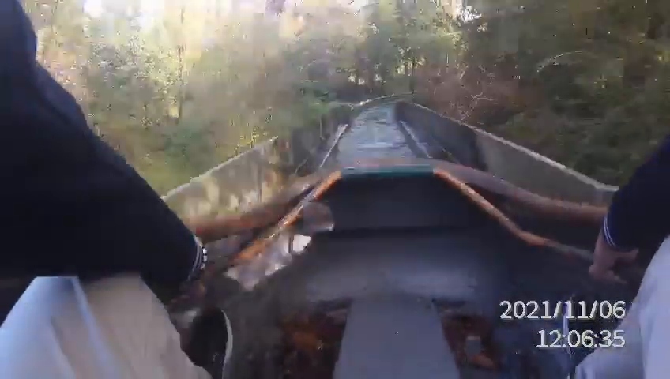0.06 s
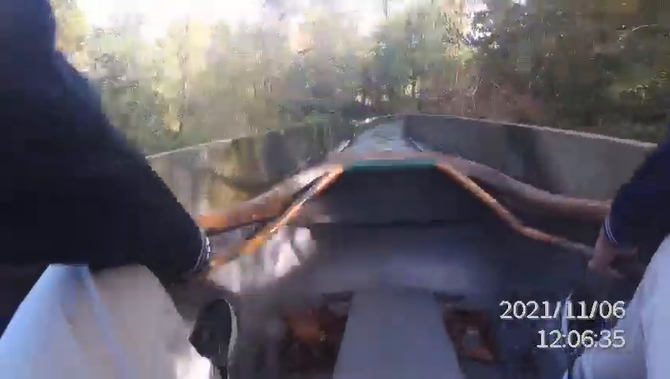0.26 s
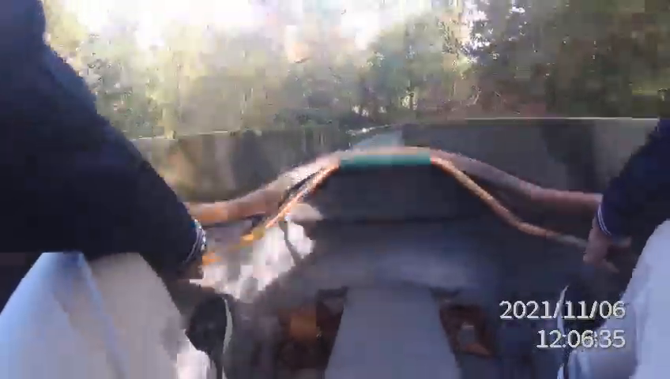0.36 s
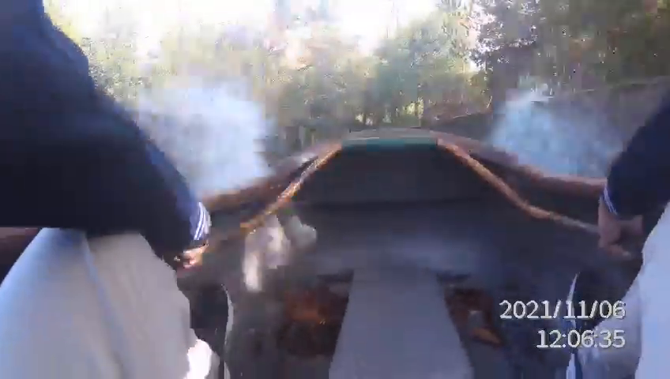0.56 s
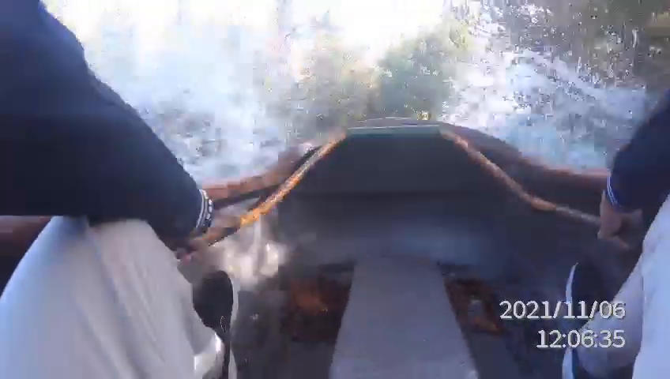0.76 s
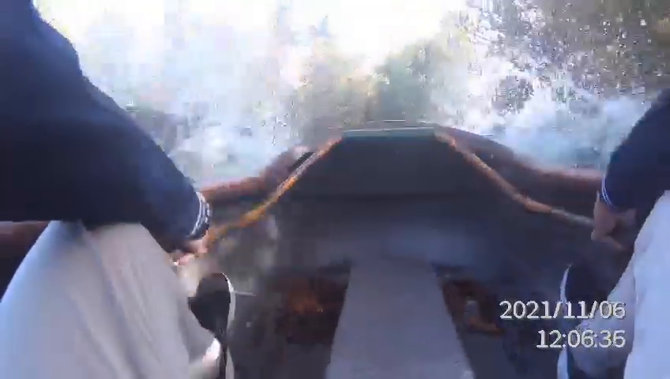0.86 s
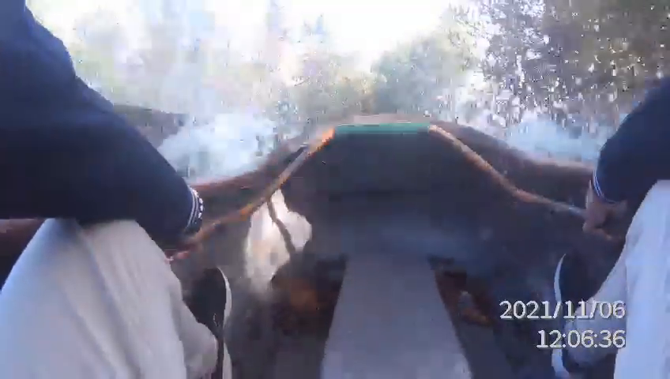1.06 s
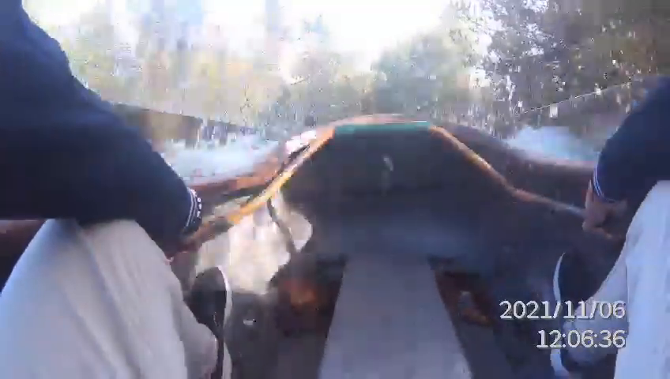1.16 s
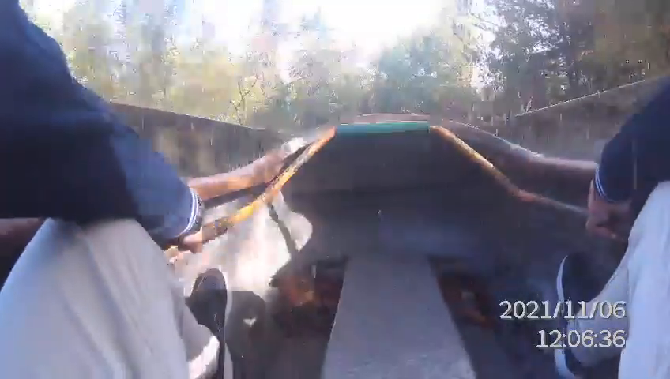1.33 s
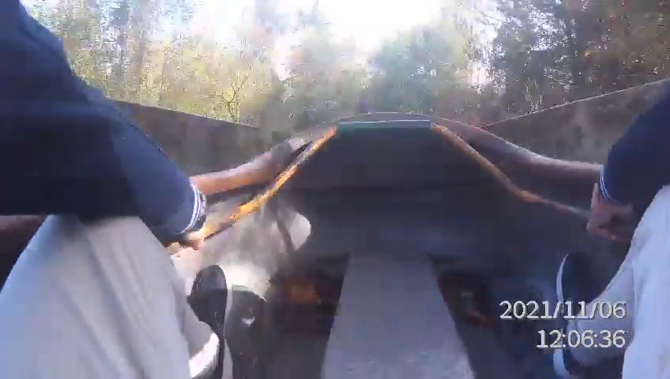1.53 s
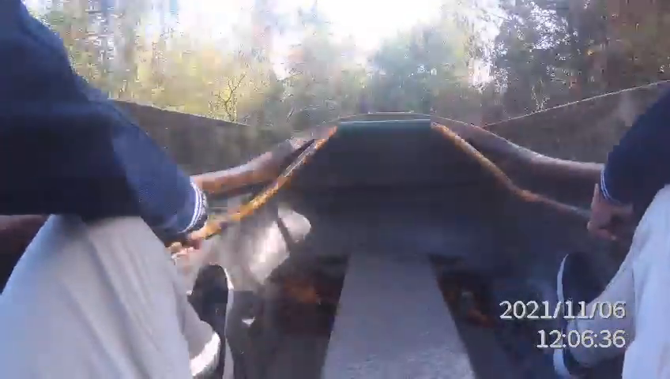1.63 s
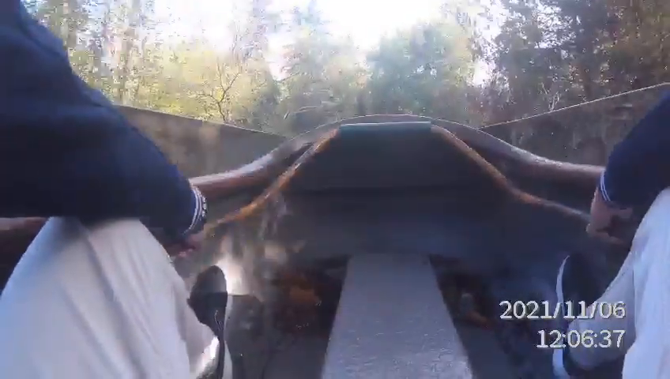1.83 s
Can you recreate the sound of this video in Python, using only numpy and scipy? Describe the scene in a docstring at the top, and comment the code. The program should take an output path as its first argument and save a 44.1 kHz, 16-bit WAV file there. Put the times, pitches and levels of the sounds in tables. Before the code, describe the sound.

A ride boat splashes into water at the foot of a drop: quick plastic knocks build to one harsh overloaded crack, then churning water and spray surge and slowly thin, heard from on board in a case.

```python
"""Flume boat splashdown

A flume boat runs into the water at the foot of a drop, heard from a camera in a plastic case on board.
Water: ringing bubbles and drops over coloured noise, for churn, splash and spray that thins out; a few gulps.
Knocks: bursts of noise ring the modes of the case, mostly on the right; the hardest overloads the microphone.
Hull: a wandering drone, deep noise and decaying sine thumps; a faint hum swells once near the end."""
import sys
import numpy as np
from scipy import signal
from scipy.fft import rfft, irfft
from scipy.io import wavfile

SR = 44100
rng = np.random.default_rng(int(sys.argv[2]) if len(sys.argv) > 2 else 0)


def put_to_file(sound):
    """Save the sound as 16-bit audio at rate SR, in the file named by the first command-line argument."""
    columns = np.atleast_2d(sound).T  # one column per channel
    safe = np.clip(columns, -1, 1)
    whole_steps = np.round(safe * 32767)
    wavfile.write(sys.argv[1], SR, whole_steps.astype(np.int16))


N = 83790

# water levels: start_s, churn_db, splash_db, spray_db
WATER_LEVELS = [(0, -41.5, -48.5, -57.5), (0.17, -41.5, -49, -56), (0.25, -37, -42, -54.5),
                (0.354, -44, -48.5, -60), (0.372, -29.5, -33, -51.5), (0.46, -34.5, -33, -50.5),
                (0.55, -31, -29.5, -41), (0.66, -34.5, -31, -40), (0.74, -35.5, -34.5, -44),
                (0.83, -34.5, -31.5, -44), (0.95, -33.5, -34, -45.5), (1.15, -37, -36.5, -47.5),
                (1.3, -38, -35, -45.5), (1.48, -36.5, -37, -49.5), (1.64, -40.5, -40, -53.5),
                (1.9, -40.5, -43, -55)]
# lag of the left side: pitch_hz, lag_rad
LEFT_LAG_CURVE = [(90, 0), (250, 0.24), (520, 0.6), (680, 0.07), (900, 0.1), (1100, 2), (1350, 1.64),
                  (1900, 0.4), (3000, 0)]
# rocking case wall: adds to the water at the left microphone, takes from it at the right
ROCK_HZ, ROCK_WIDTH_HZ, ROCK_SHARE = 1028, 105, 0.97


def water():
    """Churn, splash and spray follow their levels; a rocking wall and a phase lag set the two sides apart."""
    f = np.fft.rfftfreq(N, 1 / SR)
    out = churn() * undb(curve(WATER_LEVELS, axis=1))
    out = out + splash() * undb(curve(WATER_LEVELS, axis=2))
    out = out + spray() * undb(curve(WATER_LEVELS, axis=3))
    left_right_sign = np.array([[1], [-1]])
    rocking = abs(1 + left_right_sign * ROCK_SHARE * resonance(f, ROCK_HZ, ROCK_WIDTH_HZ))
    lag = np.exp(-1j * over_pitch(LEFT_LAG_CURVE) * np.array([[1], [0]]))
    return irfft(rfft(out) * rocking * lag, N)


# churn colour: pitch_hz, gain_db
CHURN_COLOUR = [(60, -54), (150, -2.5), (210, -9), (270, -4.5), (460, .5), (580, -2.5), (700, -1),
                (830, 3.5), (1000, 2), (1250, -4.5), (1700, -13), (3000, -32)]
CHURN_RIGHT_DB = 0  # right over left


def churn():
    """The bow wave churns: low bubbles ring briefly and rise in pitch over a rush of noise."""
    return stream(CHURN_COLOUR, CHURN_RIGHT_DB, noise_db=9, flicker_db=.8,
                  low_hz=221.5, high_hz=1406, cycles=2.3, spread_db=1.4, glide=0.036, count=1400)


# splash colour: pitch_hz, gain_db
SPLASH_COLOUR = [(700, -23), (1100, 0), (1550, -2), (2100, -2), (3200, 2.5), (4300, -2), (5200, -4.5),
                 (6300, -17), (9000, -33.5), (14000, -40)]
# splash resonances: pitch_hz, width_hz, lift_db
SPLASH_RESONANCES = [(1490, 154, 4.5), (2340, 98, 2), (3004, 73, 4), (3526, 185, 3.5), (5150, 240, 3.5)]
SPLASH_RIGHT_DB, SPLASH_SPREAD_DB = 9, .8  # right over left; spread of drop sizes


def splash():
    """Sheets of water splash against the boat: mid-pitched rings and noise, lifted at fixed resonances."""
    f = np.fft.rfftfreq(N, 1 / SR)
    sheets = stream(SPLASH_COLOUR, SPLASH_RIGHT_DB, noise_db=4, flicker_db=.4,
                    low_hz=1146, high_hz=6640, cycles=5.2, spread_db=SPLASH_SPREAD_DB, glide=0.046, count=3000)
    lift_db = sum(db * bump(f, hz, width_hz) for hz, width_hz, db in SPLASH_RESONANCES)
    return unit(irfft(rfft(sheets) * undb(lift_db), N))


# spray colour: pitch_hz, gain_db
SPRAY_COLOUR = [(3000, -5), (6000, 5.5), (8000, 1), (10000, 0.5), (12500, 1.5), (14700, 5.5), (16000, -6.5)]
SPRAY_RIGHT_DB, DROP_SPREAD_DB, SPRAY_FLICKER_DB = 6, 1.5, .4  # right over left; drop sizes; hiss


def spray():
    """Fine spray hisses: short high rings of steady pitch over noise."""
    return stream(SPRAY_COLOUR, SPRAY_RIGHT_DB, noise_db=7.5, flicker_db=SPRAY_FLICKER_DB,
                  low_hz=5560, high_hz=15500, cycles=1.4, spread_db=DROP_SPREAD_DB, glide=0, count=3000)


# likeness of the two sides: pitch_hz, likeness_0_to_1
SIDE_LIKENESS = [(150, .99), (450, 0.97), (600, 0.74), (800, 0.88), (1200, 0.87), (1450, .45), (2400, .5),
                 (4500, 0.093)]


def stream(spectrum, right_db, noise_db, flicker_db, **grain):
    """Grains over a flickering rush; both sides share the lows and hear the highs apart."""
    def layer():
        mix = unit(grains(**grain)) + undb(noise_db) * rng.standard_normal(N)
        return rfft(unit(colour(mix, spectrum)))

    shared, left, right = layer(), layer(), layer()
    like = np.clip(over_pitch(SIDE_LIKENESS), 0, 1)
    both = np.sqrt(like) * shared + np.sqrt(1 - like) * np.array([left, right])
    return irfft(both, N) * sides(right_db) * undb(flicker_db * walk(17))


def grains(low_hz, high_hz, cycles, spread_db, glide, count):
    """Bubbles or drops: short rings of random time, pitch, size and sign, rising by glide."""
    out = np.zeros(2 * N)
    for when, pitch, size, turn in rng.random((count, 4)):
        hz = low_hz * (high_hz / low_hz) ** pitch
        length = int(min(4 * cycles * SR / hz, N))
        age = np.arange(length) * hz / SR / cycles  # in decay times
        ring = np.exp(-age) * np.sin(2 * np.pi * cycles * age * (1 + glide * age / 2))
        gain = np.sign(turn - .5) * undb(-spread_db * np.log(1 - .98 * size))
        start = int(when * N)
        out[start:start + length] += ring * gain
    return out[:N]


# large single bubbles: start_s, pitch_hz, level_db
GULP_BUBBLES = [(0.376, 800, -27), (0.384, 1270, -29), (1.403, 780, -28), (1.458, 400, -33)]
GULP_CYCLES, GULP_RISE = 3, .04  # cycles to fade by 1 / e; rise of pitch in that time (share)


def gulps():
    """Large bubbles gulp out of the churn: they ring for a few cycles and rise a little in pitch."""
    t, out = np.arange(N) / SR, np.zeros(N)
    for start_s, hz, db in GULP_BUBBLES:
        age = np.maximum(t - start_s, 0) * hz / GULP_CYCLES  # in decay times
        envelope = (1 - np.exp(-GULP_CYCLES * age)) * np.exp(-age)
        out += undb(db) * envelope * np.sin(2 * np.pi * GULP_CYCLES * age * (1 + GULP_RISE * age / 2))
    return out


# knocks on the case: start_s, level_db (ring energy as if within 10 ms), colour_hz, colour_width_octaves,
# contact_s, three or four pairs of ring_hz, ring_lift_db, then body_db, tick_db (both re ring),
# right_over_left_db
CASE_KNOCKS = [(0.0035, -34.5, 2020, 3.4, 0.0025, 1850, 7.1, 3700, 10, 870, 4, -9, -22, 25),
               (0.0434, -20, 740, 1.66, 0.0031, 855, 10.6, 1840, 11.8, 5100, 17, -13, -29, 21),
               (0.0730, -26, 1510, 1.15, 0.0067, 1780, 9, 3800, 13, 950, 4, 2950, 9, -7, -34, 19),
               (0.1046, -35, 2140, 0.82, 0.0025, 1850, 9.8, 3770, 11, 2900, 4, -27.5, -26, 21),
               (0.1223, -21, 1460, 1.6, 0.0037, 470, 10.3, 1890, 11, 2920, 7, 3640, 8, -21, -28, 21),
               (0.1616, -31, 1890, 1.1, 0.0023, 1860, 12, 2280, 11, 3700, 6.3, -10, -29, 22),
               (0.2066, -35, 2400, 0.6, 0.0051, 1850, 8, 3280, 8, 3750, 5, -23, -20, 21),
               (0.2383, -13, 840, 0.95, 0.00097, 580, 3, 1680, 6, 880, 3, 2550, 4, -23, -38, 17),
               (0.3040, -3, 1706, 0.74, 0.0033, 2530, 9, 3340, 9, 1580, 4, -23.5, -26, 14.3),
               (0.335, -38, 2600, 0.82, .002, 1850, 11, 3300, 10, 2500, 4, -24, -20, 18),
               (0.388, -28.5, 2180, 0.83, 0.0015, 1850, 8.6, 2970, 8, 1300, 6, -23, -16, 16),
               (0.4448, -20.5, 2960, 0.53, 0.0035, 2960, 14, 3850, 14, 3370, 6, -24, -25, 20),
               (0.4503, -18.5, 1500, 1.26, .0027, 1900, 5, 2190, 4.2, 3800, 6, -18, -36.5, 17),
               (0.4749, -12, 2040, 1.23, 0.0033, 2380, 4.5, 3870, 8.4, 5200, 6.4, -32, -28, 21.6),
               (0.8329, -17, 3000, 1.9, 0.0043, 1925, 12, 3810, 10, 5150, 11, -25, -27, 16.4),
               (0.954, -27.5, 2980, 0.75, 0.0074, 1520, 9, 3540, 8, 3050, 4, -28, -28, 19),
               (1.2853, -31, 4260, 1.5, 0.0019, 3000, 9, 5100, 10, 3500, 5, -21, -3, 17),
               (1.3620, -19, 3100, 0.8, 0.0027, 1525, 13.4, 3490, 14.7, 3170, 6.8, -22, -15, 20)]
CONTACT_SWELL_POWER, CONTACT_TAIL_DB, CONTACT_TAIL_S = .7, -16, .0045
FAVOUR_WIDTH_HZ, BODY_LOW_HZ, BODY_HZ = 140, 110, 460  # favoured ring; bottom and top of the low body
CASE_ROLLOFF_HZ, CASE_ROLLOFF_POWER = 4860, 3.64


def knocks():
    """Milliseconds of chattering contact ring the case at favoured pitches, with a low body and bright tick."""
    size, lead, level_s = 4096, 256, .01  # samples, samples, s
    out = np.zeros((2, N + size))
    age, f = (np.arange(size) - lead) / SR, np.fft.rfftfreq(size, 1 / SR)
    rolloff = 1 / np.sqrt(1 + (f / CASE_ROLLOFF_HZ) ** (2 * CASE_ROLLOFF_POWER))
    body_band = f ** 2 / (f ** 2 + BODY_LOW_HZ ** 2) / (1 + (f / BODY_HZ) ** 4)
    tick_band = f ** 2 / (f ** 2 + 8000 ** 2)
    for start_s, db, hz, octaves, contact_s, *rings, body_db, tick_db, right_db in CASE_KNOCKS:
        swell = np.sin(np.pi * np.clip(age / contact_s, 0, 1) ** .75) ** CONTACT_SWELL_POWER
        tail = (age >= 0) * undb(CONTACT_TAIL_DB) * np.exp(-abs(age) / CONTACT_TAIL_S)
        chatter = rfft(rng.standard_normal((3, size)) * (swell + tail))

        # even out the random spectrum of the contact
        strength = unit(abs(chatter[0]))
        even = chatter[0] * causal(1 / np.sqrt(strength ** 2 + .1))

        pairs = zip(rings[::2], rings[1::2])
        favour = undb(sum(lift_db * bump(f, ring_hz, FAVOUR_WIDTH_HZ) for ring_hz, lift_db in pairs))
        softness = bump(np.log2((f + 1) / hz), 0, octaves) + undb(-59)
        ring = unit(irfft(even * causal(softness * favour * rolloff) * case_response(f)))
        body = unit(irfft(even * causal(body_band)))
        tick = unit(irfft(chatter[1:] * tick_band))

        knock = (ring + undb(tick_db) * tick) * sides(right_db) + undb(body_db) * body
        first = max(int(start_s * SR) - lead, 0)
        out[:, first:first + size] += knock * undb(db) * np.sqrt(level_s * SR / size)
    return out[:, :N]


# modes of the case: pitch_hz, width_hz, left_db, right_db
CASE_MODES = [(490, 190, -20, 7), (874, 86, 11.5, 8), (988, 225, 22, -8), (1594, 240, -31, 6),
              (1860, 470, 3.5, 0.5), (2360, 193, 16.5, -29), (2780, 75, -16, 3.5), (3250, 210, 8, 3),
              (3620, 150, -23, -2), (3830, 110, -20, -7), (5100, 520, 15.5, -27)]
CASE_DIRECT_DB = -7


def case_response(f):
    """Direct sound plus the ringing modes of the plastic case at the left and right microphone."""
    modes = sum(undb([[left_db], [right_db]]) * resonance(f, hz, width_hz)
                for hz, width_hz, left_db, right_db in CASE_MODES)
    return undb(CASE_DIRECT_DB) + modes


# dull hull thumps: start_s, pitch_hz, level_db, rise_s, decay_s
HULL_THUMPS = [(0.072, 248, -27, 0.0016, 0.0045), (0.226, 114.7, -31.5, 0.03, 0.042),
               (0.268, 228, -26, 0.0019, 0.0042), (0.368, 119, -35.5, 0.011, 0.052),
               (0.363, 329, -28.5, .005, 0.013), (0.414, 285.3, -27, 0.027, 0.012),
               (0.438, 122, -33, 0.0069, 0.015), (0.496, 115, -39, .006, 0.027),
               (0.954, 265, -34.5, 0.016, 0.049)]


def thumps():
    """The hull thumps on the water: sines with a straight rise and an exponential decay."""
    t, out = np.arange(N) / SR, np.zeros(N)
    for start_s, hz, db, rise_s, decay_s in HULL_THUMPS:
        age = np.maximum(t - start_s, 0)
        envelope = np.minimum(age / rise_s, 1) * np.exp(-np.maximum(age - rise_s, 0) / decay_s)
        out += undb(db) * envelope * np.sin(2 * np.pi * hz * age)
    return out


# hull rumble: start_s, resonance_hz, level_db
HULL_RUMBLE = [(0, 96.2, -51.5), (0.16, 106.4, -45), (0.27, 114.6, -49), (0.345, 117.6, -63),
               (0.40, 108, -50), (0.66, 85.2, -49.5), (0.9, 92, -53.5), (1.2, 90, -60.5), (1.5, 81.5, -59),
               (1.6, 100, -68), (1.9, 107, -60.5)]
RUMBLE_WIDTH_HZ, SUB_DB, SUB_RIGHT_DB = 27.5, -5, -24  # deep noise re drone: both sides, right alone


def rumble():
    """The hull drones along the channel: a narrow band of gliding pitch plus deep noise."""
    deep_points = [(15, -3), (40, -10), (80, 7), (200, 0), (1000, -72)]  # (Hz, dB)
    shared, right = unit(colour(rng.standard_normal((2, N)), deep_points))
    sub = undb(SUB_DB) * shared + undb(SUB_RIGHT_DB) * right * np.array([[0], [1]])
    tone = drone(curve(HULL_RUMBLE, axis=1), RUMBLE_WIDTH_HZ)
    return (tone + sub) * undb(curve(HULL_RUMBLE, axis=2))


HUM_HZ, HUM_S, HUM_LENGTH_S, HUM_DB = 175, 1.67, 0.065, -53  # pitch, peak time, bell spread, level


def hum():
    """A faint narrow-band hum of the hull swells once near the end."""
    t = np.arange(N) / SR
    swell = np.exp(-((t - HUM_S) / HUM_LENGTH_S) ** 2 / 2)
    return drone(np.full(N, HUM_HZ), 4.7) * undb(HUM_DB) * swell


def drone(hz, width_hz):
    """A tone of wandering strength and phase: a narrow band of noise around a moving pitch."""
    wander = walk(width_hz) + 1j * walk(width_hz)
    return unit(np.real(wander * np.exp(2j * np.pi * np.cumsum(hz) / SR)))


def undb(db):
    """Gain from dB."""
    return 10 ** (np.asarray(db) / 20)


def unit(x):
    """Scale to an RMS of 1."""
    return x / np.sqrt(np.mean(x ** 2) + 1e-18)


def sides(right_db):
    """Gains of the two channels at constant power."""
    return unit(undb([[0], [right_db]]))


def curve(table, axis):
    """One column of a table, joined by straight lines in time."""
    rows = np.array(table)
    return np.interp(np.arange(N) / SR, rows[:, 0], rows[:, axis])


def over_pitch(points):
    """(Hz, value) points joined on a log-frequency axis."""
    hz, value = np.array(points).T
    return np.interp(np.log(np.fft.rfftfreq(N, 1 / SR) + 1), np.log(hz), value)


def colour(x, points):
    """Shape a sound by (Hz, dB) points."""
    return irfft(rfft(x) * undb(over_pitch(points)), N)


def walk(rate_hz):
    """Smooth chance with a spread of 1."""
    f = np.fft.rfftfreq(N, 1 / SR)
    lowpass = np.exp(-(f / rate_hz) ** 2) * (f > 0)
    return unit(irfft(rfft(rng.standard_normal(N)) * lowpass, N))


def resonance(f, hz, width_hz):
    """Response of one mode, 1 at its centre."""
    return 1j * f * width_hz / (hz ** 2 - f ** 2 + 1j * f * width_hz)


def bump(f, centre, width):
    """A bell curve over frequency."""
    return np.exp(-((f - centre) / width) ** 2 / 2)


def causal(gain):
    """The minimum-phase response with this gain: it starts at once and rings afterwards."""
    cepstrum = irfft(np.log(gain + 1e-6))
    half = len(cepstrum) // 2
    fold = np.r_[1, np.full(half - 1, 2), 1, np.zeros(half - 1)]
    return np.exp(rfft(cepstrum * fold))


def scene():
    """All sources at the two microphones."""
    return water() + gulps() + knocks() + thumps() + rumble() + hum()


TOP_HZ = 15600


def record(dry):
    """The microphone clips at full scale; a steep low-pass cuts the top."""
    low_pass = signal.ellip(8, .2, 70, TOP_HZ, fs=SR, output="sos")
    return signal.sosfilt(low_pass, np.clip(dry, -1, 1))


dry = scene()
out = record(dry)
put_to_file(out)
```